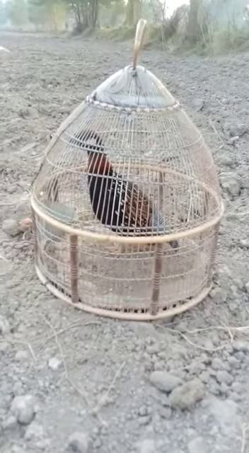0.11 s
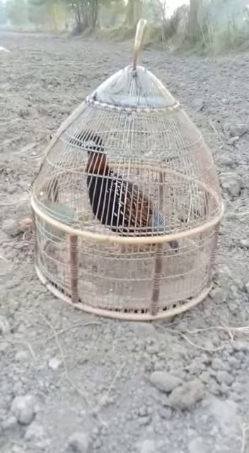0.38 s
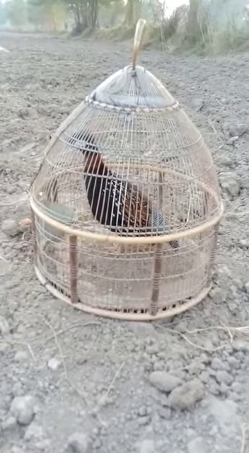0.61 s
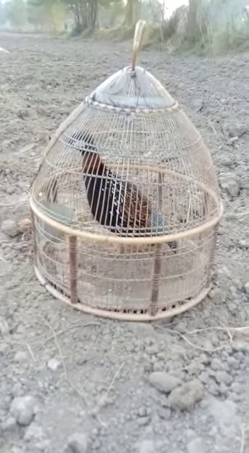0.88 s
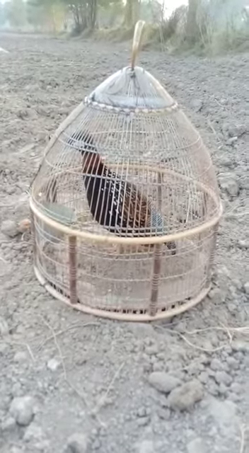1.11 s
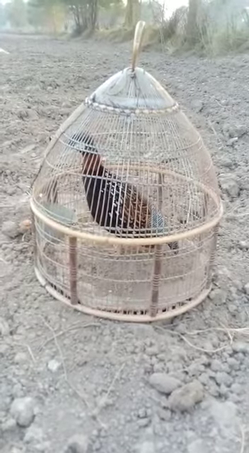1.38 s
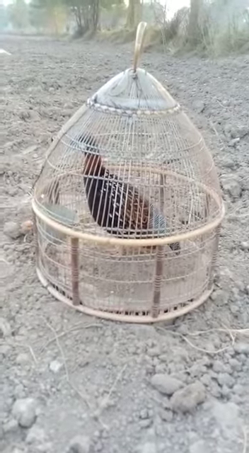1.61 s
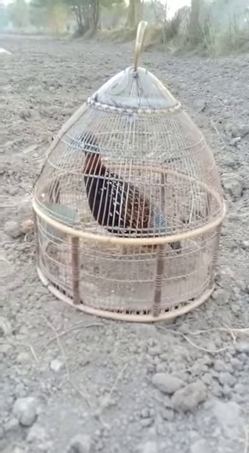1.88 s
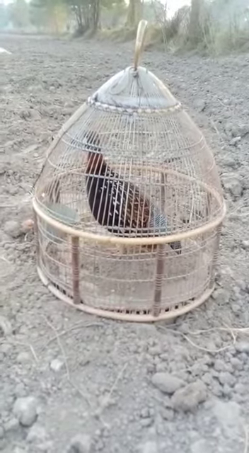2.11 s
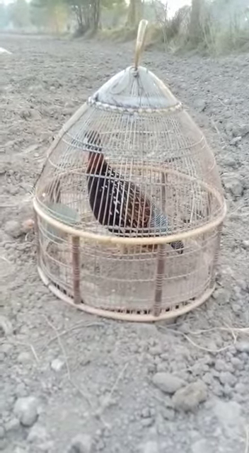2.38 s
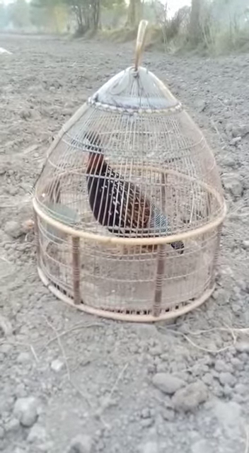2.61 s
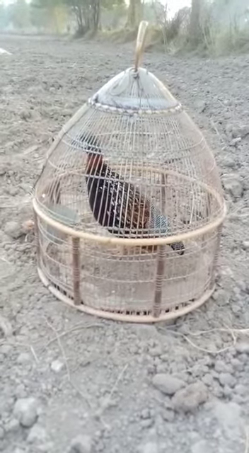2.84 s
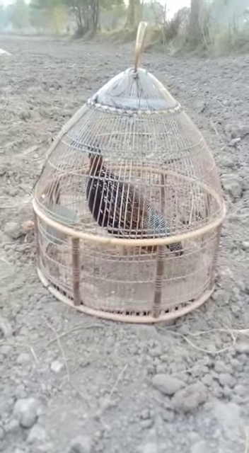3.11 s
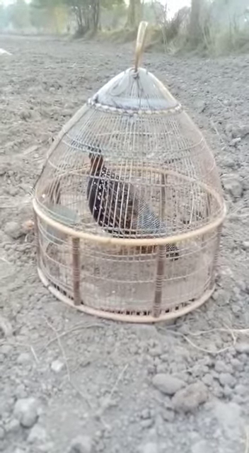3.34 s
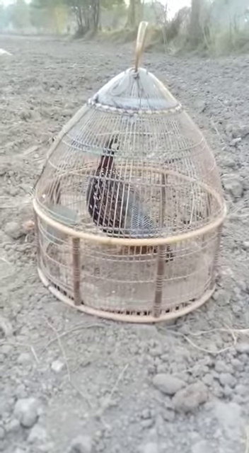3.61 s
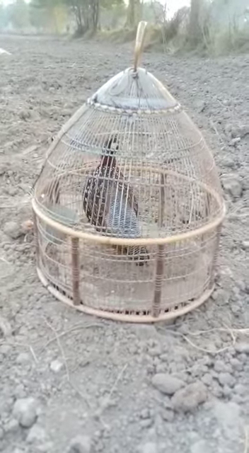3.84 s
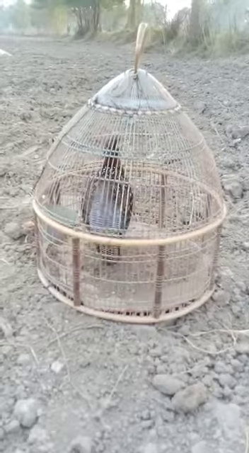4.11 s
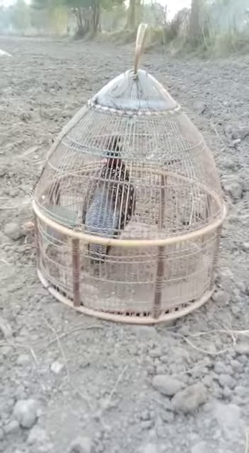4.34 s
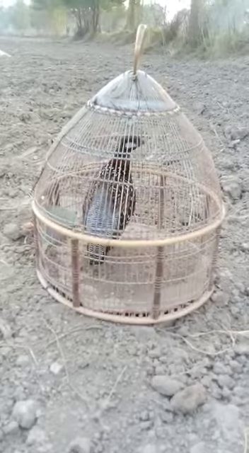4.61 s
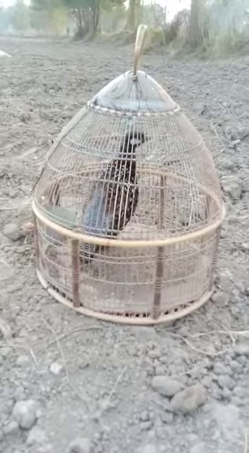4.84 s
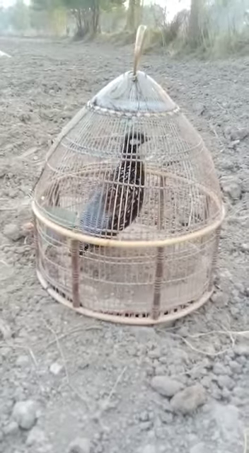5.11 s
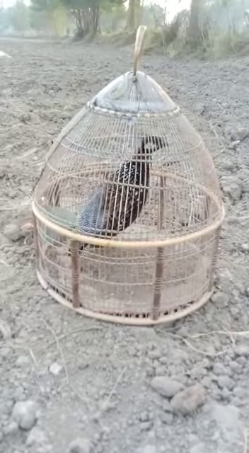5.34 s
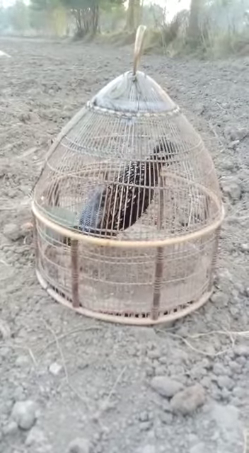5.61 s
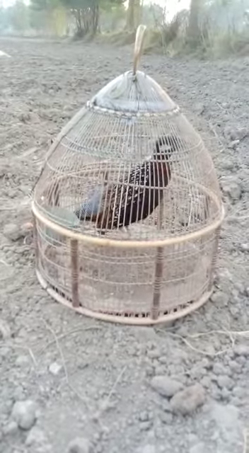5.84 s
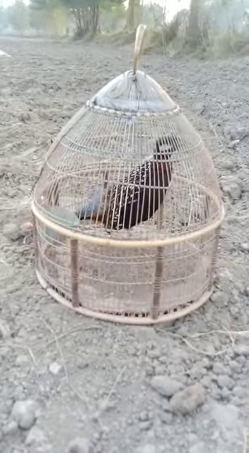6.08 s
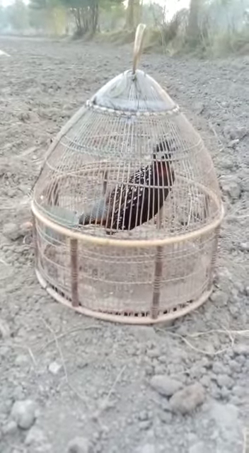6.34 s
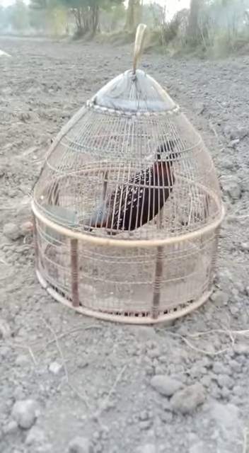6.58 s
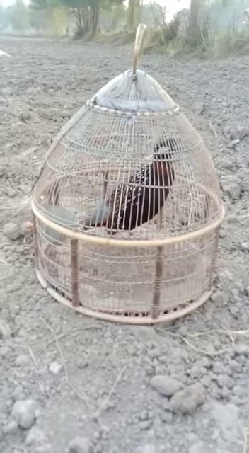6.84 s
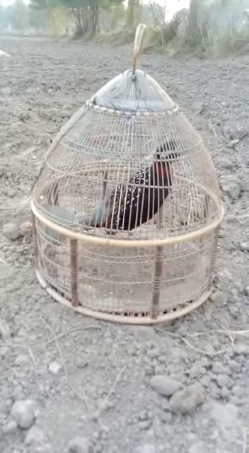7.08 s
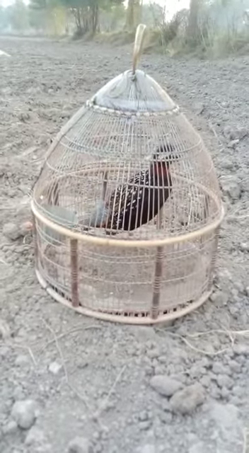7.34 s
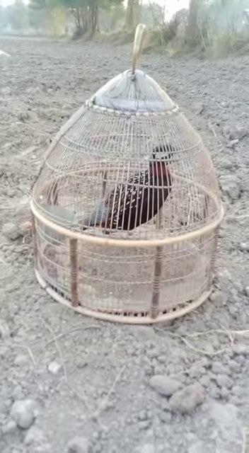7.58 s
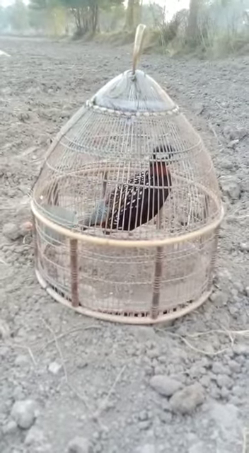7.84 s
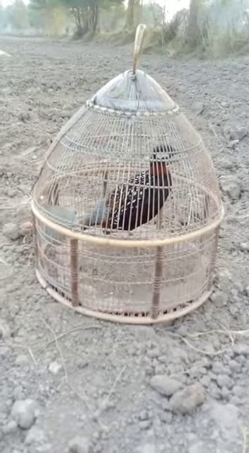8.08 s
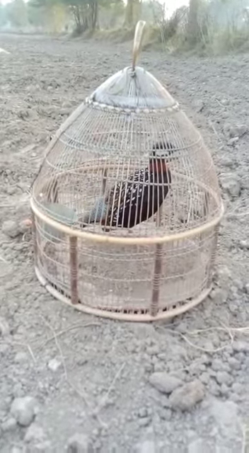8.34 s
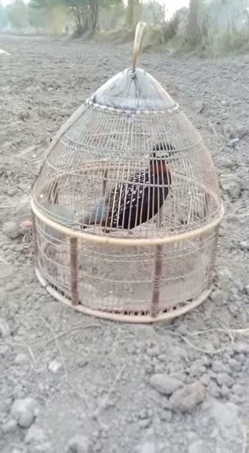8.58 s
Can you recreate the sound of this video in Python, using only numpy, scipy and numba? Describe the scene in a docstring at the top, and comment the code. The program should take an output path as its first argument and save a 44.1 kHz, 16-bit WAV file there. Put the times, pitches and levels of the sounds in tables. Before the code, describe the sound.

Outdoors in an open field, over five seconds of very faint hush: low rumble, thin insects, tiny distant whistles, churrs and chucks. Then a caged partridge, close to the microphone and nearly dry, snaps a cluck and high squeak, pauses, and gives harsh buzzing rasps in two similar phrases, each with a short squeak cutting in. The quiet field returns, with a very faint far cock crow.

```python
"""A caged partridge-like bird calls once, close by: a cluck and squeak, then harsh rasps, two cut by squeaks.
Its rasps are a tone swept by a fluttering membrane through two throat resonances; its notes are gliding tones.
Far off, small birds whistle (gliding near-sines), churr and chuck (filtered breath); a cock crows (partials).
Insects sing thinly (narrow noise bands) over a low rumble and drone (shaped noise).
The field is open and edged by trees: noise tails give the scatter from cage, clods and trunks."""
import sys
import numpy as np
from scipy import signal
from scipy.fft import rfft, irfft, next_fast_len
from scipy.io import wavfile
from scipy.ndimage import uniform_filter1d, minimum_filter1d
from numba import njit

SR = 44100
rng = np.random.default_rng(int(sys.argv[2]) if len(sys.argv) > 2 else 0)


def ratio_of_db(decibels):
    """Turn decibels (scalar or array-like) into linear amplitude factors; 0 dB maps to 1."""
    return 10 ** (np.asarray(decibels, float) / 20)


def dump_mix(stems):
    """Bounce the given channels to the path in sys.argv[1] as a 16-bit WAV at rate SR."""
    frames = np.atleast_2d(stems).T  # one column per channel
    limited = np.clip(frames, -1, 1)  # hard clip at full scale
    pcm = np.round(limited * 32767).astype(np.int16)
    wavfile.write(sys.argv[1], SR, pcm)


N = 383654

# Far birds and cock: all their levels stand before the common far-bus trim in scene().
# far whistles: (start [s], length [s], first pitch [Hz], last pitch [Hz], mid-glide level [dB], bend [exponent])
# a bend under 1 swoops at once, over 1 holds and then drops
WHISTLES = [(0.164, 0.051, 6360, 3650, -77, 0.66), (0.208, 0.07, 3700, 1970, -65.5, 1.35),
            (.235, 0.12, 4400, 2430, -69.5, 0.9), (.39, 0.094, 2450, 1314, -66, 1.26),
            (.60, 0.08, 4130, 2960, -71.5, 0.86), (.70, 0.057, 4400, 3480, -64, 1.04),
            (.86, 0.14, 2550, 1200, -64, 1.35), (.96, .08, 4700, 3270, -76, 1.6),
            (1.25, 0.056, 3700, 3540, -72.5, 0.96), (1.52, .07, 3740, 3740, -77, 1.1),
            (1.801, 0.077, 3240, 3490, -71, 0.81), (3.585, 0.054, 6120, 6050, -72, 2.2),
            (1.38, 0.086, 3570, 3000, -73.5, 2), (1.38, 0.064, 4400, 4300, -71, 1.1),
            (2.15, 0.054, 4800, 3950, -74, 0.78), (2.66, 0.19, 4700, 2300, -75.5, 0.52),
            (3.145, 0.18, 3120, 1960, -63.5, 2.26), (3.16, 0.16, 4960, 2800, -82, 0.87),
            (3.575, 0.14, 3114, 1940, -60.5, 2.6), (3.78, 0.09, 3900, 2420, -75, .9),
            (3.9, 0.12, 2350, 2300, -77.5, 0.93), (4.45, 0.15, 5380, 3700, -76.5, 0.31),
            (4.83, .21, 764, 630, -79, 2.34), (5.47, 0.13, 600, 601, -75, 1.1),
            (5.915, 0.081, 3800, 2830, -68.5, .6), (5.975, 0.12, 2904, 1856, -64, 0.74),
            (6.72, 0.36, 903, 880, -77, 0.94), (6.855, 0.12, 3100, 2065, -59.5, 2.15),
            (7.665, 0.081, 3320, 2560, -62.5, 1.9), (7.67, 0.14, 1250, 1154, -68.5, 0.45)]
# one arched peep: (time [s], pitch [Hz], level [dB])
PEEP = [(8.625, 1480, -67), (8.652, 1830, -60.5), (8.685, 1490, -84)]
# far breathy churrs: (start [s], length [s], centre [Hz], width [Hz], crest level [dB])
CHURRS = [(-0.01, 0.074, 3100, 1970, -64.5), (0.446, 0.075, 1330, 500, -66.5),
          (0.969, 0.038, 1300, 496, -61.5), (0.739, 0.12, 3020, 2180, -65.5),
          (0.976, 0.07, 3900, 1200, -66), (1.843, 0.049, 1230, 500, -61.5), (1.852, .12, 3200, 2250, -65),
          (2.797, 0.12, 3200, 2340, -65.5), (3.673, 0.17, 2530, 900, -69.5), (3.727, 0.097, 4030, 980, -66),
          (4.186, 0.079, 2140, 1960, -66), (4.315, 0.08, 3100, 500, -72), (4.56, 0.12, 3400, 1800, -65.5),
          (5.527, 0.15, 3600, 1515, -63.5), (7.652, 0.11, 3020, 2540, -57.5),
          (8.656, 0.066, 2500, 2560, -65)]
# lone chucks: (start [s], crest level [dB], bird [index])
CHUCKS = [(1.166, -56, 0), (1.663, -57.5, 0), (2.069, -58, 0), (2.25, -64.5, 1), (2.465, -65.5, 1),
          (2.848, -63.5, 2), (3.238, -64.5, 2), (5.038, -66, 2), (5.08, -82, 2)]
# throat resonances, one list per chucking bird: (centre [Hz], width of each pass [Hz], relative level [dB])
CHUCK_THROATS = [
    [(1250, 340, 6), (2350, 410, 7.5), (3800, 690, 0), (5700, 320, -1.5), (7180, 270, -3.5)],
    [(1000, 85, 8), (3100, 230, 10.5), (4110, 69, 12)],
    [(565, 270, 1), (1279, 240, -2)],
    [(3700, 670, 15), (4800, 120, -4.5), (5580, 150, 4)],
]
# chuck length, bird by bird: (length [s])
CHUCK_LENGTHS = [0.036, 0.028, 0.066, 0.052]
# the cock's gliding fundamental: (time [s], pitch [Hz], level before the partial balance [dB])
CROW_GLIDE = [(7.89, 559, -101), (7.95, 558, -78), (8.2, 578.3, -73.5), (8.38, 571.4, -73),
              (8.53, 551, -76), (8.62, 524, -80)]
# balance of the cock's partials, from the first up: (mean gain [dB])
CROW_PARTIALS = [-8.5, -5, -7, 6, -18, -9.5, -9.5, -21, -19]

# rumble and hiss of the open field: (frequency [Hz], mean density [dB per Hz])
FIELD_SPECTRUM = [(20, -122), (45, -109), (64, -100), (100, -91.5), (160, -102), (270, -106), (400, -109),
                  (1000, -112), (2000, -112), (4000, -115), (6300, -118), (7000, -126), (13000, -127),
                  (15500, -124)]
# steady wavering bands, thin song and a low hum: (centre [Hz], width of each pass [Hz], mean level [dB])
STEADY_BANDS = [(1250, 120, -81.5), (5744, 290, -85), (6050, 420, -93), (4000, 250, -94), (80.4, 11, -73.5)]
# far drone: (time [s], level before a 3 dB cut [dB])
DRONE = [(0.0, -67), (0.4, -66), (0.9, -72.5), (2.6, -71), (4.3, -69.5), (5.3, -72), (5.6, -83), (8.7, -81)]
# colour of the wash from the trees: (frequency [Hz], relative gain [dB])
TREES_COLOUR = [(800, -16), (2200, -5), (2900, -5), (3600, -4), (6500, 3), (7600, -4), (10000, -26),
                (15000, -28)]

# opening cluck: (time [s], pitch [Hz], level [dB], overtones [dB])
CLUCK = [(5.599, 3600, -48, -25), (5.6045, 4600, -36, -25), (5.6062, 4600, -23, -25),
         (5.608, 4200, -27, -15), (5.611, 4000, -16, -9), (5.6205, 3800, -12, -10),
         (5.6225, 3000, -13, -11), (5.625, 2350, -11, -14), (5.6272, 2250, -10, -14),
         (5.629, 2100, -22, -8), (5.632, 1500, -35, -20), (5.638, 1450, -39, -20)]
# leap from the cluck up to the first squeak: (time [s], pitch [Hz], level [dB], overtones [dB])
LEAP = [(5.6383, 2000, -30, -20), (5.6395, 4000, -11, -14), (5.6415, 6400, -20, -25)]
# squeaks: (start [s], length [s], top pitch [Hz], sag at both ends [Hz], crest level [dB], beat depth [0-1])
SQUEAKS = [(5.641, .0277, 7000, 600, -21, .8), (6.622, .0275, 6450, 220, -19.5, .05),
           (7.2145, .0225, 6950, 400, -27, .05)]
# plunge out of a squeak: (time from its end [s], pitch [Hz], level [dB], overtones [dB])
PLUNGE = [(.0007, 5600, -11, -20), (.0015, 3800, -17, -20), (.0025, 2900, -11, -20),
          (.0045, 2700, -22, -25), (.009, 2600, -40, -25)]
# throat note under a squeak: (time from its start [s], pitch [Hz], level against the squeak [dB])
THROAT_NOTE = [(-.002, 2500, 0), (.003, 2700, -4), (.009, 2800, -21), (.026, 2750, -22)]

# rasps: (start [s], held until [s], level [dB], softer at the start by [dB], 1 fades or 0 is cut by a squeak)
RASPS = [(6.155, 6.275, -10.5, 9.5, 1), (6.465, 6.624, -12, 18, 0), (6.6522, 6.668, -12, -2, 1),
         (7.006, 7.072, -11, 10, 1), (7.152, 7.216, -12.5, 15.5, 0), (7.239, 7.32, -13, 8, 1)]
# weak ticks before a rasp: (start [s], level [dB])
FALSE_STARTS = [(6.996, -36), (7.139, -31.5)]
# instants at which the voice shuts: (time [s])
CATCHES = [6.657, 6.666, 6.674, 7.243, 7.317, 7.325]
# lower throat resonance at full effort: (time [s], centre [Hz])
LOWER_THROAT = [(6.155, 2889), (6.27, 3036), (6.465, 2934), (6.62, 2782), (6.68, 2915), (7.01, 2837),
                (7.08, 2961), (7.155, 2972), (7.2, 2890), (7.27, 3030), (7.33, 3000)]
# colour of beak and microphone: (frequency [Hz], relative gain [dB])
BEAK_COLOUR = [(200, -53), (950, -47.5), (1300, -11), (2200, -3), (2650, -3), (4500, 2.5), (5500, 7),
               (7000, -4.5), (8200, -19), (9300, -12), (12500, -29), (15200, -2), (15500, -9.5)]

WHISTLE_FADE_DB = 5.5   # each dies away by this much along its length
CHATTER_FROM_S, CHATTER_STEP_S, CHATTER_DB = 0.381, .127, -70   # last bird: a dozen chucks, before far trim
BEAT_S, BEAT_FIRST_S, SQUEAK_OVER_DB = .0125, .0032, -27   # beat period, first crest, squeak overtones
RISE_DB_PER_S, FADE_DB_PER_S, FADE_S = 1500.5, 1700.5, .017
FLUTTER_HZ, FLUTTER_SAG_HZ_PER_S = 274, 240   # mean rate at each start, slowing as the breath runs out
UPPER_THROAT_HZ, UPPER_RISE_HZ_PER_S = 4400, 1900   # at full effort; the beak opens along each rasp
CATCH_S, FALSE_START_S = .002, 0.0056   # reach either side of a catch, length of a tick
TENSE_S, SLACK_START = .012, .15   # the membranes tighten after each start: time constant, lost effort
SLACK_HZ, SLACK_WIDTH_HZ, SLACK_DB = 1300, 830, 18   # low chest note; gain before the rasp is levelled


def rms_one(x):
    """Scales to rms 1."""
    return x / np.sqrt(np.mean(x ** 2) + 1e-20)


def stretch(rows, fade_s):
    """Sample numbers, faded gate and interpolated columns of one table of curve rows."""
    s, *columns = np.transpose(rows)
    at = np.arange(int(s[0] * SR), min(int(s[-1] * SR), N))
    gate = np.clip(np.minimum(at / SR - s[0], s[-1] - at / SR) / fade_s, 0, 1)
    return at, gate, [np.interp(at / SR, s, c) for c in columns]


def drift(hz):
    """Chance wandering, low-passed noise of rms 1."""
    r = np.exp(-2 * np.pi * hz / SR)
    return rms_one(signal.lfilter([1], [1, -2 * r, r * r], rng.standard_normal(N + SR))[SR:])


def colour(x, points):
    """Smooth spectrum shaping, straight lines on a log-frequency axis."""
    hz, db = np.transpose(points)
    size = next_fast_len(len(x))
    grid = np.fft.rfftfreq(size, 1 / SR) + 1
    gain = ratio_of_db(np.interp(np.log(grid), np.log(hz), db))
    return irfft(rfft(x, size) * gain, size)[:len(x)]


def resonance(x, hz, width_hz):
    """Two-pole resonance, gain about 1 on top."""
    r = np.exp(-np.pi * width_hz / SR)
    poles = [1, -2 * r * np.cos(2 * np.pi * hz / SR), r * r]
    return signal.lfilter([(1 - r * r) / 2, 0, (r * r - 1) / 2], poles, x)


def narrow(x, hz, width_hz):
    """A resonance applied twice, rms 1."""
    return rms_one(resonance(resonance(x, hz, width_hz), hz, width_hz))


@njit
def moving_resonance(x, turn, r):
    """The same resonance with a moving centre: turn in radians per sample, r the pole radius."""
    y = np.zeros(len(x))
    for i in range(2, len(x)):
        drive = (1 - r * r) / 2 * (x[i] - x[i - 2])
        y[i] = drive + 2 * r * np.cos(turn[i]) * y[i - 1] - r * r * y[i - 2]
    return y


def field():
    """Rumble and hiss, a drone that comes and goes, narrow wavering bands: all shaped noise."""
    air = colour(rng.standard_normal(N), FIELD_SPECTRUM)
    out = ratio_of_db(1.2 * drift(2.5)) * np.sqrt(SR / 2) * air   # the root sets white noise to 0 dB per Hz
    at, gate, (db,) = stretch(DRONE, fade_s=1e-4)
    drone_gain = ratio_of_db(db - 3.0 + 1.5 * drift(5)[at])
    out[at] += drone_gain * narrow(rng.standard_normal(N), 120, 160)[at]
    for hz, width_hz, db in STEADY_BANDS:
        waver_db = (3.5 if hz > 500 else 1.2) * drift(4)
        out += ratio_of_db(db + waver_db) * narrow(rng.standard_normal(N), hz, width_hz)
    return out


def trees(x, t60=.55, edge_s=0.11, edge_db=5, spread_s=0.012):
    """Trunks and ground scatter back a dying wash, with a swell from the nearest row of trees."""
    t = np.arange(SR) / SR
    level_db = -60 * t / t60 + edge_db * np.exp(-((t - edge_s) / spread_s) ** 2)
    echo = colour(rng.standard_normal(SR), TREES_COLOUR) * ratio_of_db(level_db) * np.clip(t / 0.0049, 0, 1)
    return signal.fftconvolve(x, echo / np.sqrt(np.sum(echo ** 2)))[:N]


def ground(x, t60=0.079):
    """Cage bars and clods throw back a short bright scatter: decaying white noise."""
    t = np.arange(SR // 10) / SR
    echo = rng.standard_normal(SR // 10) * ratio_of_db(-60 * t / t60)
    return signal.fftconvolve(x, echo / np.sqrt(np.sum(echo ** 2)))[:N]


def crow():
    """A far cock: a harmonic stack whose partials fade in and out on the air."""
    out = np.zeros(N)
    at, gate, (hz, db) = stretch(CROW_GLIDE, fade_s=0.012)
    phase = 2 * np.pi * np.cumsum(hz) / SR
    for k, part_db in enumerate(CROW_PARTIALS):
        fading_db = (1.5 if k == 3 else 5) * drift(12)[at]   # the fourth partial is the steadiest
        out[at] += np.sqrt(2) * gate * ratio_of_db(db + part_db + fading_db) * np.sin((k + 1) * phase)
    return out


def puff(s, length, db):
    """Sample numbers and half-sine swell of one puff of breath."""
    at = np.arange(int(s * SR), min(int((s + length) * SR), N))
    return at, ratio_of_db(db) * np.abs(np.sin(np.pi * (at / SR - s) / length))


def churrs_and_chucks():
    """Grainy breath noise through one wide band, or through the few resonances of a throat."""
    out, breath = np.zeros(N), rng.standard_normal(N) * ratio_of_db(4.3 * drift(90))
    for s, length, hz, width_hz, db in CHURRS:
        at, shape = puff(s, length, db)
        edges = [max(hz - width_hz / 2, 100), hz + width_hz / 2]
        band = signal.butter(3, edges, "band", fs=SR, output="sos")
        out[at] += shape * rms_one(signal.sosfilt(band, breath[at]))
    chatter = []   # the last bird chucks in a row, with loose timing and level
    for k, (late, db) in enumerate(rng.normal(0, [.01, 1.5], size=(12, 2))):
        chatter.append((CHATTER_FROM_S + CHATTER_STEP_S * k + late, CHATTER_DB + db, len(CHUCK_LENGTHS) - 1))
    for s, db, bird in list(CHUCKS) + chatter:
        bird = round(bird)
        at, shape = puff(s, CHUCK_LENGTHS[bird], db)
        throat = sum(ratio_of_db(g) * narrow(breath[at], hz, w) for hz, w, g in CHUCK_THROATS[bird])
        out[at] += shape * rms_one(throat)
    return out


def whistle_rows():
    """Curve rows (time [s], pitch [Hz], level [dB]): bent glides in log pitch that fade, then the peep."""
    u = np.linspace(0, 1, num=24)
    for s, length, first_hz, last_hz, db, bend in WHISTLES:
        hz = first_hz * (last_hz / first_hz) ** (u ** bend)
        yield np.transpose([s + length * u, hz, db + WHISTLE_FADE_DB * (.5 - u)])
    yield PEEP


def whistles():
    """Gliding near-sines, fluttered and roughened by moving air on the way."""
    out, flutter = np.zeros(N), ratio_of_db(1.7 * drift(45))
    blur = .8 * drift(60)   # phase wander [rad]
    for rows in whistle_rows():
        at, gate, (hz, db) = stretch(rows, fade_s=.004)
        tone = np.sin(2 * np.pi * np.cumsum(hz) / SR + blur[at])
        out[at] += np.sqrt(2) * gate * ratio_of_db(db) * flutter[at] * tone
    return out


def note_rows():
    """Curve rows of the cluck and leap, then each squeak: arched beating top, plunge, throat note."""
    yield CLUCK
    yield LEAP
    for s, length, hz, sag_hz, db, beat in SQUEAKS:
        t = np.linspace(0, length, num=40)
        crest = np.abs(np.cos(np.pi * (t - BEAT_FIRST_S) / BEAT_S))
        swell = 1 - np.clip(beat, 0, .95) * (1 - crest)
        arch_hz = hz - sag_hz * (2 * t / length - 1) ** 2
        top = np.transpose([s + t, arch_hz, db + 20 * np.log10(swell), SQUEAK_OVER_DB + 0 * t])
        yield np.vstack([top, np.add(PLUNGE, [s + length, 0, 0, 0])])
        yield [(s + dt, f, db + d, SQUEAK_OVER_DB) for dt, f, d in THROAT_NOTE]


def notes():
    """The membrane sings a clean tone for cluck and squeaks; fast pitch jumps break up into breath."""
    out, breath = np.zeros(N), rms_one(colour(rng.standard_normal(N), BEAK_COLOUR))
    sizzle = narrow(breath, 15300, 700)   # a thin sizzle at the very top
    for rows in note_rows():
        at, gate, (hz, db, over_db) = stretch(rows, fade_s=.0008)
        phase = 2 * np.pi * np.cumsum(hz) / SR
        over = np.sin(2 * phase)
        over += ratio_of_db(-16) * np.sin(3 * phase) * (3 * hz < 16000)
        over += ratio_of_db(-7) * np.sin(4 * phase) * np.exp(-((4 * hz - 15400) / 900) ** 2)
        jump = np.clip(np.abs(np.gradient(hz)) / 18, 0, 1)   # full at 18 Hz per sample
        under = ratio_of_db(-26) * np.exp(-((hz - 4000) / 700) ** 2) * np.sin(phase / 2)   # an octave below
        under += ratio_of_db(-25 + 14 * jump) * breath[at]
        under += ratio_of_db(-18) * (hz < 5000) * sizzle[at]
        out[at] += np.sqrt(2) * gate * ratio_of_db(db) * (np.sin(phase) + ratio_of_db(over_db) * over + under)
    return out


def rasp_rows():
    """Curve rows (time [s], flutter [Hz], level [dB], upper throat [Hz]): rise, hold, fade; then ticks."""
    for s, until, db, soft_db, fades in RASPS:
        shape = [(s, db - soft_db), (s + soft_db / RISE_DB_PER_S + 1e-4, db), (until, db)]
        shape += [(until + FADE_S, db - FADE_S * FADE_DB_PER_S)] * round(fades)
        rows = []
        for t, level_db in shape:
            flutter_hz = FLUTTER_HZ - FLUTTER_SAG_HZ_PER_S * (t - s)
            upper_hz = UPPER_THROAT_HZ + UPPER_RISE_HZ_PER_S * (min(t, until) - s)
            rows.append((t, flutter_hz, level_db, upper_hz))
        yield rows
    for s, db in FALSE_STARTS:
        yield [(t, FLUTTER_HZ, db, UPPER_THROAT_HZ) for t in (s, s + FALSE_START_S)]


def rasps(swing_hz=1300, skew=1.0, lean=1.41, throb=0.3):
    """A tone near 4 kHz is swept up and down by a fluttering membrane and rings two throat resonances."""
    seconds = np.arange(N) / SR
    flutter, gain, effort = np.full(N, 260.), np.zeros(N), np.ones(N)
    low, high = np.interp(seconds, *np.transpose(LOWER_THROAT)), np.full(N, 4600.)
    for rows in rasp_rows():
        at, gate, (hz, db, upper) = stretch(rows, fade_s=0.00058)
        flutter[at], gain[at], high[at] = hz, gate * ratio_of_db(db), upper
        # slack membranes, when soft or just starting: the tone sags
        soft = .55 * np.clip((-17 - db) / 17, 0, 1)
        effort[at] = 1 - soft - SLACK_START * np.exp(-(at - at[0]) / SR / TENSE_S)
    for s in CATCHES:
        gain *= np.clip(np.abs(seconds - s) / CATCH_S, 0, 1)

    cycle = 2 * np.pi * np.cumsum(flutter * (1 + 0.014 * drift(72.15))) / SR
    membrane = np.cos(cycle) + skew / 4 * np.cos(2 * cycle + lean)
    sweep = swing_hz * (1 + 0.085 * drift(110)) * membrane
    unsteady = .55 * drift(300)   # phase wander [rad]
    tone_hz = effort * (0.52 * (low + high) + 45 * drift(40) + sweep)
    phase = 2 * np.pi * np.cumsum(tone_hz) / SR + unsteady
    source = np.sin(phase) + ratio_of_db(-2) * np.sin(2 * phase) + ratio_of_db(-3) * np.sin(3 * phase)
    hiss = ratio_of_db(-15) * rng.standard_normal(N)
    source = source * (1 + throb * np.sin(cycle + 2.96)) + hiss

    low_turn = 2 * np.pi * low * effort ** .15 / SR
    high_turn = 2 * np.pi * high * effort ** .3 / SR
    throat = ratio_of_db(-11.5) * source
    throat += ratio_of_db(7) * moving_resonance(source, low_turn, np.exp(-np.pi * 130 / SR))   # 130 Hz wide
    throat -= ratio_of_db(2.0) * moving_resonance(source, high_turn, np.exp(-np.pi * 260 / SR))   # 260 Hz wide
    throat += ratio_of_db(SLACK_DB) * resonance(source * (1 - effort) ** 2, SLACK_HZ, SLACK_WIDTH_HZ)
    throat = colour(throat, BEAK_COLOUR)
    throat /= np.sqrt(np.abs(uniform_filter1d(throat ** 2, size=340)) + 1e-12)   # running level held at 1

    buzz = np.zeros(N)   # the flutter itself, barely radiated
    for k, db in enumerate([-54.5, -53.5, -53.5, -52.5, -45.5]):
        buzz += ratio_of_db(db) * ratio_of_db(4 * drift(60)) * np.sin((k + 1) * cycle + 0.65 * drift(50))
    return gain * (throat + buzz)


def scene():
    """The near bird is almost dry, the far ones are wet."""
    clear_of_lows = signal.butter(3, 1100, "high", fs=SR, output="sos")
    clear_of_top = signal.cheby2(10, 45, 15800, fs=SR, output="sos")
    near = signal.sosfilt(clear_of_top, rasps() + signal.sosfilt(clear_of_lows, notes()))
    far = whistles() + churrs_and_chucks() + crow()
    far = far + ratio_of_db(-3.5) * ground(far, t60=.2) + ratio_of_db(-11) * trees(far)
    near = near + ratio_of_db(-25.5) * ground(near) + ratio_of_db(-30.0) * trees(near)
    return (near + ratio_of_db(-2.5) * far + field())[None]


def roll_off(x):
    """The treble ends steeply here."""
    return signal.sosfilt(signal.butter(12, 16670, fs=SR, output="sos"), x)


def record(dry, top=.57):
    """A fast limiter holds the peaks near top, a share of full scale."""
    room_left = np.minimum(1, top / (np.abs(dry) + 1e-9))
    lowest = minimum_filter1d(room_left, size=45, axis=1)
    gain = uniform_filter1d(lowest, size=45, axis=1)
    return roll_off(gain * dry)


dry = scene()
out = record(dry)
dump_mix(out)
```